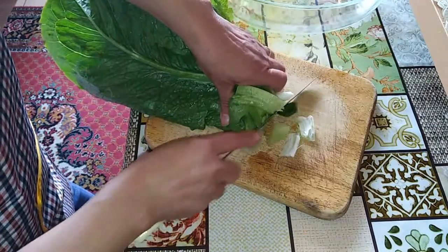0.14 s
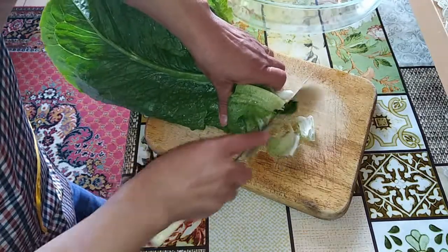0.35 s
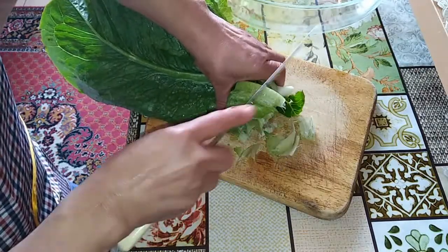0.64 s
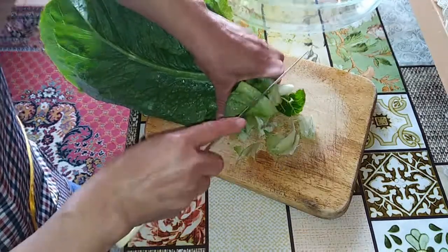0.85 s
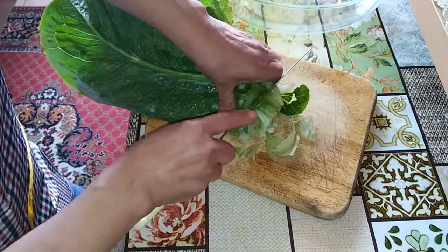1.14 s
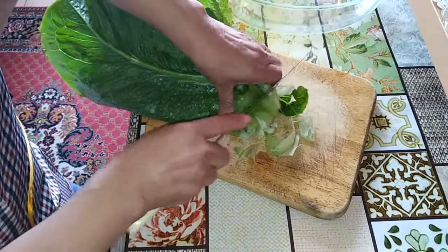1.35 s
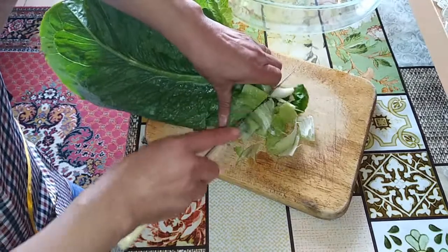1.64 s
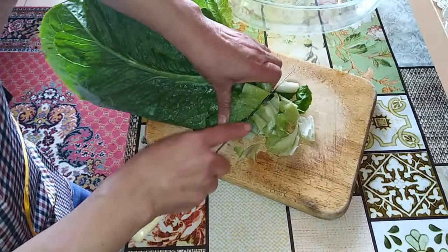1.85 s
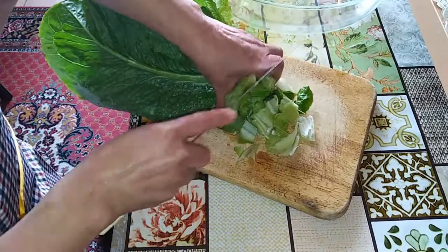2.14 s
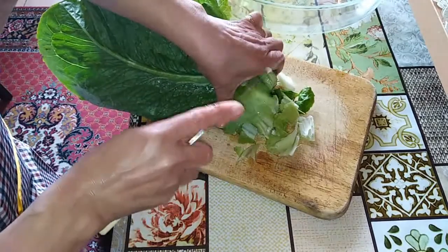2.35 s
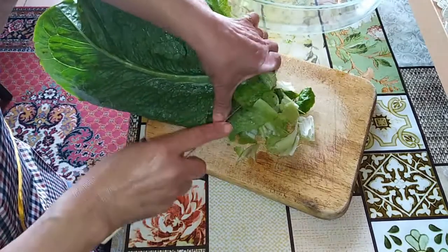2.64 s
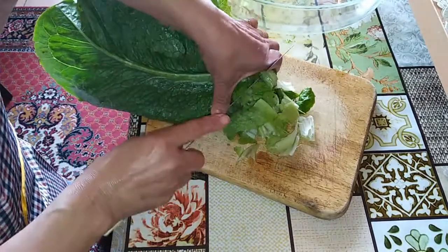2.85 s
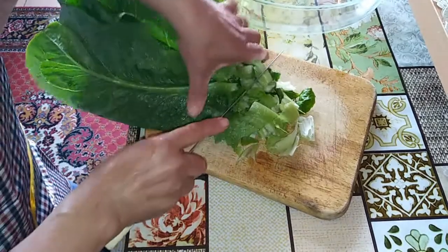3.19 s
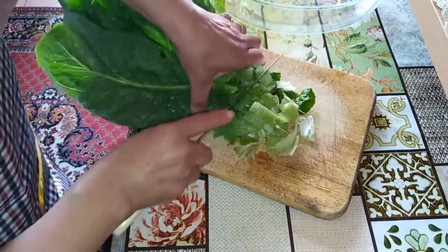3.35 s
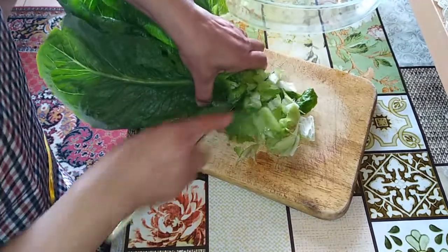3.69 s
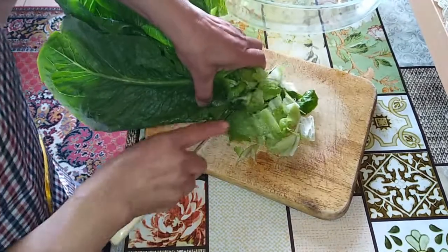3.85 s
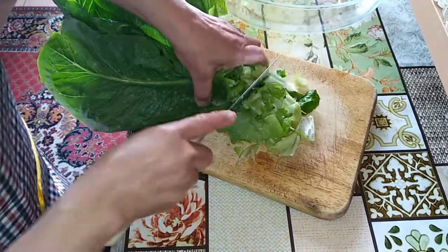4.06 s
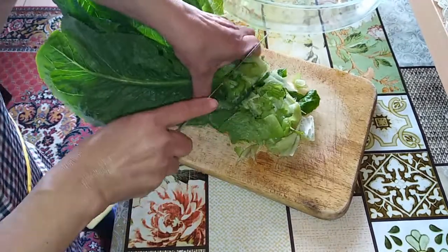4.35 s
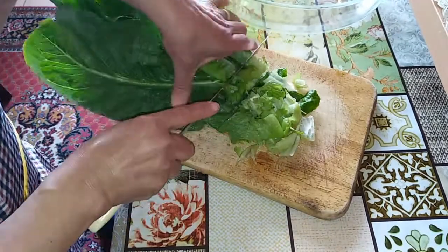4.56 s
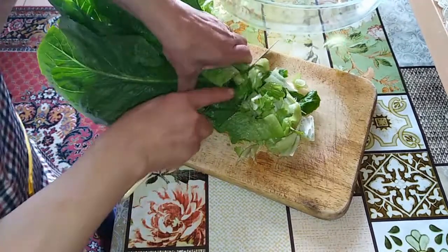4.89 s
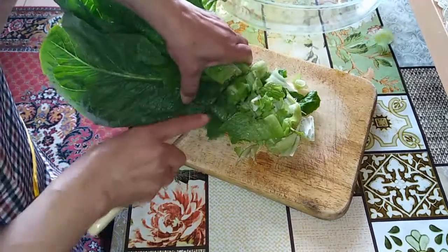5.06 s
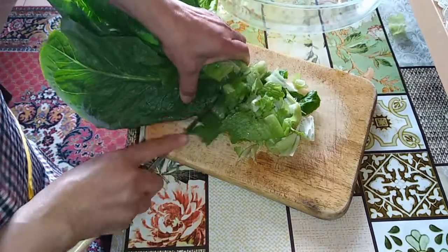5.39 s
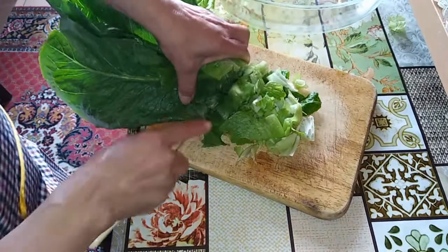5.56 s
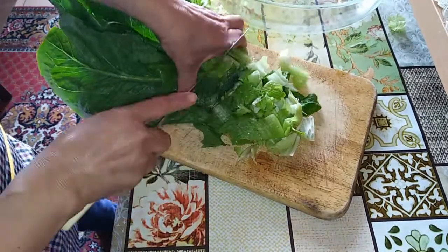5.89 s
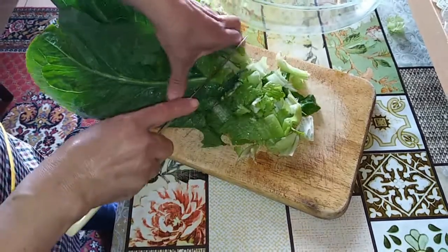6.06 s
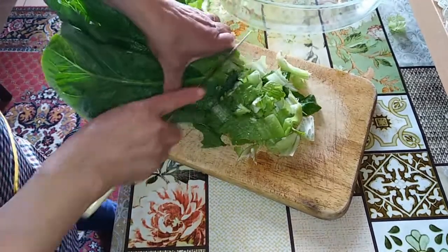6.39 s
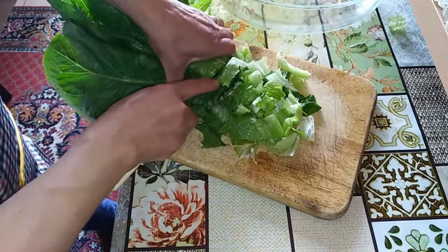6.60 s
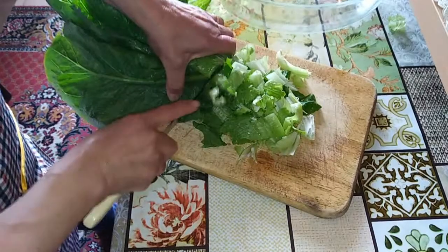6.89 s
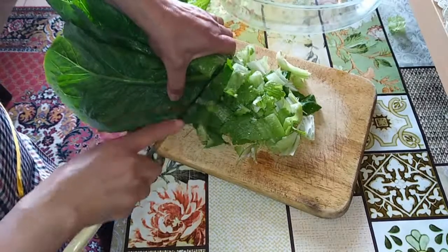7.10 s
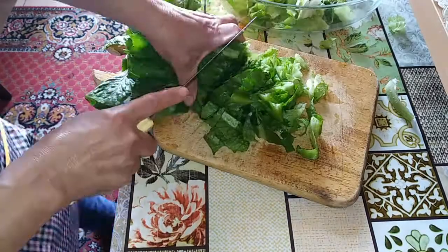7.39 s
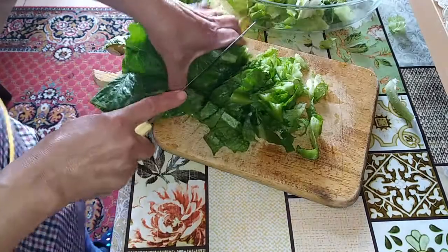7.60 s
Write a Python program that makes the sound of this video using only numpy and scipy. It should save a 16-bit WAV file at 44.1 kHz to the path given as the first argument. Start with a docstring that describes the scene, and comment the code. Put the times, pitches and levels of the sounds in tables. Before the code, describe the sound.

Crisp leaves and stiff ribs are cut in bursts: a quick crackle at once, a strong run of crunches, a long quiet gap with tiny rustles, then further groups of crunching strokes with bright cracks and hollow board knocks. The last cuts are smaller and fade into light leaf movement. Close phone pickup in a small, quiet, lightly reverberant kitchen, with faint hollow hum.

```python
"""In a quiet kitchen, a knife saws through a rolled bundle of crisp lettuce on a wooden board, near a phone.
Cells burst as thousands of tiny noise grains, ribs snap as ringing cracks, and the blade knocks the board,
which rings at its own pitches. Each push shakes the table as low noise; leaves rustle between strokes.
The blade hisses as it is drawn back, over a wavering hollow hum and faint air. A far tone starts near the end."""
import sys
import numpy as np
from scipy import signal
from scipy.io import wavfile
from scipy.ndimage import uniform_filter1d

SR = 44100
rng = np.random.default_rng(int(sys.argv[2]) if len(sys.argv) > 2 else 0)


def volts(x):
    """Linear amplitude factor 10**(x/20) for a level x in dB, scalar or array-like."""
    e = np.asarray(x, float) / 20
    return 10 ** e


def generate_wav(sig):
    """Save sig (samples, or channels by samples) to the path in sys.argv[1] as 16-bit PCM at SR."""
    pcm = np.round(np.clip(np.atleast_2d(sig).T, -1, 1) * 32767).astype(np.int16)
    wavfile.write(sys.argv[1], SR, pcm)


N = 341334  # length in samples
TIME = np.arange(N) / SR


def unit(x):
    """Scale to rms 1."""
    return x / np.sqrt(np.mean(x ** 2))


def at_hz(points, hz):
    """Read a (pitch, value) curve at any pitch, along a log pitch axis."""
    points = np.array(points)
    return np.interp(np.log(hz), np.log(points[:, 0]), points[:, 1])


def band(x, hz, width, order=2):
    """Keep only the pitches around hz, over a band width Hz wide."""
    edges = [hz - width / 2, hz + width / 2]
    return signal.sosfilt(signal.butter(order, edges, "band", fs=SR, output="sos"), x)


# How alike the left and right ports hear each pitch: pitch_hz, correlation (1 = the same)
EAR_LIKENESS = [(60, 1), (130, 0.87), (290, 0.82), (640, 0.37), (1400, 0.45), (3060, 0.67), (6730, 0.13),
                (14800, 0.12)]


def pair(hz, size):
    """Left and right noise, as alike as the two ports hear this pitch."""
    like = np.clip(at_hz(EAR_LIKENESS, hz), -.9, .99)
    mid, side = rng.standard_normal((2, size))
    opposite = side * np.array([[1], [-1]])
    return np.sqrt((1 + like) / 2) * mid + np.sqrt((1 - like) / 2) * opposite


def resonances(table, order=2):
    """Noise heard through resonances (pitch_hz, width_hz, level_db), scaled together to rms 1."""
    layers = [volts(db) * unit(band(pair(hz, N), hz, width, order)) for hz, width, db in table]
    return unit(sum(layers))


def flicker(hold):
    """Random levels held for `hold` samples and slewed, spread 1."""
    steps = np.repeat(rng.standard_normal(N // hold + 1), hold)
    return unit(uniform_filter1d(steps, size=hold))[:N]


def add(out, s, x):
    """Mix x into out at time s."""
    i = int(s * SR)
    out[:, i:i + x.shape[-1]] += x[..., :out.shape[1] - i]


def swells(start, rise, hold, db, fall_db_s, tail_db, tail_db_s):
    """Power of each event, one row each, every millisecond: climb, hold, quick fall, then a faint slow tail."""
    rise_db = 25  # climbed from start to the end of the rise
    t = np.arange(0, N / SR + .002, .001) - np.c_[start]
    rise, hold = np.maximum(np.c_[rise], .002), np.maximum(np.c_[hold], 0)
    after = np.maximum(t - rise - hold, 0)
    quick_fall = volts(-2 * fall_db_s * after)
    slow_tail = volts(2 * (tail_db - tail_db_s * after))
    climb_db = -rise_db * np.maximum(1 - t / rise, 0).clip(0, 8)
    return volts(2 * (np.c_[db] + climb_db)) * (quick_fall + slow_tail)


def to_samples(per_ms):
    """From one value a millisecond to one a sample."""
    return np.interp(TIME * 1000, np.arange(len(per_ms)), per_ms)


# Knife strokes through the bundle: start_s, rise_s, hold_s, level_db, thick_rib_db (above thin leaf)
KNIFE_STROKES = [(0, 0.0016, 0.0067, -33, 3.5), (0.034, 0.092, 0.074, -40.5, 1),
                 (.19, 0.035, 0.056, -46.5, 10), (0.822, 0.066, 0.023, -31, 2),
                 (0.885, .07, 0.085, -36, 0.5), (1.04, .04, 0.039, -46.5, 8),
                 (1.108, 0.061, 0.024, -39.5, 0.5), (1.25, .12, 0.045, -25.5, -1),
                 (1.442, 0.065, 0.073, -43, 4.5), (1.514, 0.066, 0.028, -38.5, 4.5),
                 (1.619, 0.058, 0.024, -28, 3.5), (3.137, 0.075, 0.023, -42, -4),
                 (3.186, .14, 0.19, -30.5, 3.5), (3.551, 0.038, 0.13, -34.5, 1),
                 (3.713, 0.065, 0.022, -31.5, 5.5), (4.549, .01, 0.27, -38, 4.5),
                 (4.641, 0.069, 0.073, -26, 2), (4.822, 0.03, 0.074, -38, 7.5),
                 (4.861, 0.05, 0.075, -30.5, 2.5), (4.992, 0.036, 0.025, -33, 4),
                 (5.173, 0.024, 0.057, -50.5, 6), (5.184, 0.097, 0.024, -34, 3),
                 (5.351, 0.062, 0.071, -43.5, 5), (6.158, 0.024, 0.17, -46.5, -1.5),
                 (6.233, 0.13, .16, -28.5, 2), (6.554, 0.032, 0.1, -40, 3), (6.586, 0.086, .14, -32.5, 5),
                 (6.952, 0.083, 0.017, -35.5, 1.5), (7.085, 0.041, 0.071, -46, 11),
                 (7.237, 0.032, .03, -52, 8), (7.287, .02, 0.03, -50.5, 2)]
# Loose leaves shift under the fingers: start_s, hold_s, level_db, thick_rib_db (above thin leaf)
LEAF_RUSTLES = [(0.327, 0.049, -65.5, 8), (0.405, 0.028, -61, 0), (0.648, 0.031, -46.5, -20),
                (0.73, 0.04, -54.5, -13), (0.792, 0.062, -48, -11), (1.85, 0.027, -61, 3),
                (2.061, 0.091, -58, -23.5), (2.186, 0.098, -61, -3.5), (2.329, 0.049, -71.5, -11),
                (2.494, 0.052, -64.5, -10), (2.674, 0.16, -73.5, -29.5), (2.851, 0.055, -67, -25),
                (2.917, .03, -56, -7), (2.957, 0.027, -47.5, -4), (3.022, 0.078, -56.5, -3.5),
                (3.946, 0.023, -48.5, 1), (4.048, 0.029, -50, -10), (4.122, .015, -64, -14),
                (4.166, 0.032, -59.5, -5), (4.23, 0.14, -52, -8), (4.346, 0.16, -50.5, -6),
                (5.54, 0.14, -63, -3.5), (5.814, 0.11, -54.5, -40), (5.915, 0.043, -47, -9),
                (5.981, 0.031, -49.5, -7), (6.048, 0.12, -59, -5), (7.34, .012, -60, -30),
                (7.38, 0.024, -60, -25), (7.424, .08, -51.5, -12), (7.504, 0.083, -50.5, -1.5),
                (7.63, 0.031, -58, -8), (7.707, .02, -60, -6)]


def blade():
    """Strokes and rustles together: crunch gain, and its thick-rib and sharp-edge colour in dB."""
    stroke_edge_db, rustle_edge_db = 5, 7  # boost of the top octave
    rustle_rise_s = 0.013
    rows = [(*row, stroke_edge_db) for row in KNIFE_STROKES]
    for s, hold_s, level_db, rib_db in LEAF_RUSTLES:
        rows.append((s, rustle_rise_s, hold_s, level_db, rib_db, rustle_edge_db))
    start, rise, hold, db, thick_db, edge_db = np.transpose(rows)
    power = swells(start, rise, hold, db, fall_db_s=303.5, tail_db=-19.5, tail_db_s=79.5)
    total = power.sum(axis=0)
    # the loudest event at each moment decides most of the colour
    thick_now, edge_now = thick_db @ power / total, edge_db @ power / total
    return to_samples(np.sqrt(total)), to_samples(thick_now), to_samples(edge_now)


# Basic colour of breaking leaf: pitch_hz, level_db (per Hz, before rib and edge colour)
LEAF_COLOUR = [(150, -34), (250, -1), (371, -8.5), (418, -12.5), (455, -1.5), (1190, -4.5), (2240, 3),
               (4000, 4), (7060, 6), (13500, -21), (14200, -17.5), (15000, -40.5)]


def crunch(count=7000, spread_db=3.4, reach_oct=.5, grain_s=.002, bed=.42, hold_s=.06):
    """Bursting cells: short grains of all sizes, each loudest around its own pitch."""
    when, size, pitch = rng.random((count, 3)).T
    at = (when * N).astype(int)
    power = volts(-2 * spread_db * np.log(1 - .994 * size))  # many small grains, few big ones
    grain_hz = 250 * 60 ** pitch
    gain, thick_db, edge_db = blade()
    out, whole = 0, 0
    for hz in 280 * 2 ** np.arange(0, 5.8, 1 / 3):
        near = np.exp(-(np.log2(hz / grain_hz) / reach_oct) ** 2)
        bursts = np.bincount(at, power * near, N)
        # lower grains come from bigger pieces and last longer
        keep = np.exp(-1 / (SR * grain_s * (4000 / hz) ** 0.044))
        bursts = signal.lfilter([1 - keep], [1, -keep], bursts)
        # even out the bursts over hold_s, so the strokes and rustles set the loudness
        local_mean = uniform_filter1d(bursts, int(hold_s * SR)) + 1e-12
        shape = np.sqrt(bed + bursts / local_mean)
        thick = np.clip(np.log2(2600 / hz) / 1.25, 0, 1.6)
        sharp = np.clip(np.log2(hz / 7000) / 0.75, 0, 1)
        db = at_hz(LEAF_COLOUR, hz) + 10 * np.log10(hz / 4000)  # higher bands are wider
        whole = whole + volts(2 * db)
        db = db + thick * thick_db + sharp * edge_db
        # each fold of leaf has its own colour, so the bands wander apart
        db = db + 2.5 * flicker(hold=2000)
        # the left port hears more treble, the right more of the low middle
        db = db + (.55 if hz > 900 else -.7) * np.array([[1], [-1]])
        out = out + volts(db) * unit(band(shape * pair(hz, N), hz, 0.25 * hz))
    return out * gain / np.sqrt(whole)


# Single rib snaps: start_s, peak_db (left-right average, before the room), pitch_hz of the ring
RIB_SNAPS = [(0.0973, -28.5, 6120), (0.155, -24, 4020), (0.1746, -24.5, 7360), (0.2588, -16, 7450),
             (0.4236, -41.5, 2470), (0.652, -31.5, 5300), (0.6713, -32, 5610), (0.7307, -19.5, 6700),
             (0.8281, -26, 3580), (0.8859, -7.5, 6550), (0.8992, -13.5, 6660), (0.9667, -20, 5800),
             (1.0369, -24, 5880), (1.0845, -21, 4060), (1.1764, -22.5, 7050), (1.1947, -20.5, 7090),
             (1.2075, -21, 6030), (1.296, -23, 8180), (1.3267, -19, 6360), (1.3494, -13.5, 5860),
             (1.3664, -18, 3520), (1.3892, -13.5, 7340), (1.5727, -23, 6500), (1.6481, -24.5, 7360),
             (1.6756, -16, 2980), (1.8791, -44, 3400), (2.0867, -44.5, 6560), (2.1161, -46, 6540),
             (2.2371, -44, 2160), (2.267, -44.5, 2150), (2.5226, -53.5, 3110), (2.9262, -44, 3970),
             (2.9691, -32.5, 6560), (3.2012, -33, 3520), (3.258, -24.5, 3770), (3.3181, -22, 6870),
             (3.3511, -12.5, 6700), (3.4312, -17.5, 5850), (3.5555, -23, 2350), (3.5912, -23, 3880),
             (3.6192, -35, 2900), (3.6526, -19.5, 1630), (3.7511, -26.5, 5750), (3.7971, -19, 4130),
             (3.9691, -34, 2600), (3.9962, -35.5, 4440), (4.0575, -38, 6340), (4.1762, -33.5, 2330),
             (4.4116, -32.5, 7650), (4.4394, -33, 6740), (4.5575, -27.5, 5600), (4.5832, -26, 6620),
             (4.6468, -16, 6030), (4.7126, -8, 5140), (4.8425, -22.5, 3350), (4.8505, -24.5, 3280),
             (4.8684, -23, 1980), (4.9227, -19, 3400), (5.026, -28.5, 3700), (5.1744, -27.5, 1650),
             (5.2235, -23, 2180), (5.2786, -22, 3360), (5.2957, -18.5, 3180), (5.4324, -28.5, 3740),
             (5.83, -31.5, 6860), (5.9404, -29, 6440), (6.1658, -29, 8440), (6.1942, -16.5, 5500),
             (6.2928, -24, 7220), (6.3167, -21, 7150), (6.3632, -21, 3740), (6.4076, -28, 7040),
             (6.5889, -47, 2470), (6.6692, -20, 1780), (6.774, -17.5, 3430), (6.9617, -37, 2560),
             (6.9827, -34, 1120), (7.0388, -20.5, 3650), (7.1288, -29.5, 2240), (7.278, -30.5, 2700),
             (7.3856, -36, 8200), (7.541, -29.5, 6860), (7.647, -32, 7150), (7.727, -32.5, 6800)]


def snaps(ring_share=.9, patter=.55, ring_width=.14):
    """Ribs break: a sudden bright crack with a short ring and a dying patter."""
    out, t = np.zeros((2, N)), TIME[:SR // 8]
    pans_db = 1 + 0.53 * rng.standard_normal(len(RIB_SNAPS))  # left above right
    for (s, db, hz), pan_db in zip(RIB_SNAPS, pans_db):
        crack_fade = volts(-60 * t / .008)
        patter_fade = volts(-60 * t / .05 * np.sqrt(5000 / hz))  # 60 dB down in .05 s at 5000 Hz
        burst = pair(hz, len(t)) * (crack_fade + patter * patter_fade)
        # the break itself is one hard step
        burst = burst + 4.5 * (np.arange(len(t)) == 0)
        ring = unit(band(burst, hz, ring_width * hz, order=1))
        crack = ring_share * ring + unit(band(burst, 5220, 6000))
        level = volts(db + np.array([[pan_db], [-pan_db]]) / 2)
        add(out, s, crack / np.abs(crack.mean(axis=0)).max() * level)
    return out


# Blade and ribs on the board: start_s, level_db (peak of the ring, before the room), hardness (0-1)
BOARD_KNOCKS = [(0.005, -27, 0.07), (0.257, -31.5, 0.87), (0.856, -40, 0.75), (1.086, -33.5, 0.45),
                (1.298, -40.5, 0.35), (1.434, -20.5, 0.93), (1.684, -25, 0.45), (3.253, -36.5, 0.55),
                (3.587, -34.5, 0.8), (3.654, -29.5, 0.95), (4.557, -28, 0.45), (4.711, -24.5, 0.6),
                (4.79, -15.5, 0.72), (4.888, -26, 1), (4.926, -22.5, 0.05), (5.174, -41.5, 1),
                (5.312, -27.5, 0.1), (6.295, -41, 0.9), (6.776, -32, 0.9), (7.034, -34, 0.7),
                (7.06, -41, 0.3), (7.211, -34.5, 0.15)]
# Ways the board rings: pitch_hz, level_db (before hardness and spot), fade_s (time to drop 60 dB)
BOARD_MODES = [(110, -6, 0.12), (144, -7, 0.15), (199, -2.5, 0.062), (412.6, -4, 0.13), (531.6, 1.5, 0.047),
               (604, -9, 0.082), (910, -8, 0.02), (954, -4.5, 0.045), (1160, -9, 0.056), (1500, -5, .018)]


def knocks(tick_db=-8):
    """The board rings at its modes, plus a short noise tick; a harder contact favours the higher modes."""
    out, t = np.zeros((2, N)), TIME[:SR // 6]
    hz, mode_db, fade_s = np.transpose(BOARD_MODES)[:, :, None]
    for s, db, hard in BOARD_KNOCKS:
        # every knock varies the level, pitch and left-right lean of each mode
        spot_db, detune, turn = rng.standard_normal((len(BOARD_MODES), 3)).T[:, :, None]
        tilt_db = (np.clip(hard, 0, 1) - .5) * 12 * np.log2(hz / 500)
        fade = volts(mode_db + tilt_db + 0.59 * spot_db - 60 * t / fade_s)
        rings = fade * (1 - np.exp(-t / 0.0012))
        phase = 2 * np.pi * hz * (1 + 0.016 * detune) * t
        # less alike at the two ports means further apart in phase
        lean = np.arccos(np.clip(at_hz(EAR_LIKENESS, hz), -1, 1)) * np.sign(turn) / 2
        ring = np.array([(rings * np.sin(phase + side * lean)).sum(axis=0) for side in (1, -1)])
        tick = band(pair(1100, len(t)), 1600, 1600, order=1) * volts(-60 * t / 0.012)
        knock = ring / np.abs(ring).max() + volts(tick_db) * tick / np.abs(tick).max()
        add(out, s, volts(db) * knock)
    return out


def room(x, t60_s=0.39, wet_db=-12):
    """Hard kitchen walls give a short diffuse tail, another to each port."""
    t = TIME[:SR // 3]
    tail = rng.standard_normal((2, len(t))) * volts(-60 * t / t60_s) * (t > .003)
    tail = band(tail, 3700, 7000, order=1)
    tail = tail / np.sqrt((tail ** 2).sum(axis=1, keepdims=True))
    return x + volts(wet_db) * signal.fftconvolve(x, tail, axes=1)[:, :N]


# The hand leans on the knife and the table shakes: start_s, hold_s, level_db (before the jolts)
HAND_PUSHES = [(0, 0.011, -33.5), (0.123, 0.047, -42.5), (0.243, 0.037, -40.5), (0.492, 0.23, -56),
               (0.644, .04, -51), (0.838, .05, -45), (.94, 0.27, -48.5), (1.191, 0.14, -41.5),
               (1.328, 0.076, -31), (1.554, 0.038, -46), (1.641, .08, -40), (2.092, 0.076, -61.5),
               (2.945, 0.065, -56.5), (3.287, 0.11, -39), (3.434, .07, -34.5), (3.647, 0.076, -47.5),
               (3.76, 0.029, -39), (3.949, .02, -51.5), (4.24, 0.23, -59), (4.556, 0.061, -37.5),
               (4.697, .1, -34.5), (4.878, 0.055, -36), (5.003, 0.097, -46.5), (5.186, 0.055, -49),
               (5.293, 0.011, -30), (5.422, 0.13, -57), (5.645, 0.013, -50.5), (6.165, 0.055, -46),
               (6.29, 0.15, -43.5), (6.435, 0.05, -32.5), (6.621, 0.26, -43), (7.04, 0.054, -42),
               (7.19, 0.039, -40.5), (7.256, 0.034, -49), (7.43, 0.18, -60.5)]
# Low resonances of the table: pitch_hz, width_hz, level_db (relative to each other)
TABLE_RESONANCES = [(35, 41, -19), (69, 23, -4.5), (84, 47, -15.5), (112.6, 40.8, 3), (151.5, 32, -10),
                    (185.6, 62, -6)]


def shake():
    """The table's low resonances, jolted by each push."""
    rumble_db = -66  # the table never rests quite still
    start, hold, db = np.transpose(HAND_PUSHES)
    rise = 0.022 + 0 * start  # seconds, the same for every push
    power = swells(start, rise, hold, db, fall_db_s=204, tail_db=-19, tail_db_s=67)
    jolts_db = 2.5 * flicker(hold=1500)
    gain = to_samples(np.sqrt(power.sum(axis=0) + volts(2 * rumble_db)))
    lean_db = np.array([[1.4], [-1.4]])  # stronger on the left
    return resonances(TABLE_RESONANCES) * gain * volts(jolts_db + lean_db)


# The blade is drawn back: start_s, end_s, pitch_hz, width_hz, level_db (of the hiss before its swell)
BLADE_SLIDES = [(0.36, 0.666, 6000, 2000, -64), (5.52, 5.82, 6100, 2500, -64.5)]


def slides():
    """The flat of the blade wipes back along the wet leaves: a thin smooth hiss."""
    out = 0
    for start, end, hz, width, db in BLADE_SLIDES:
        swell = np.sin(np.pi * np.clip((TIME - start) / (end - start), 0, 1)) ** .5
        out = out + volts(db) * swell * unit(band(pair(hz, N), hz, width))
    return out


# Hollow hum: pitch_hz, width_hz, level_db (relative to each other)
HUM_RESONANCES = [(549.6, 84, -7.5), (615.5, 49, -9.5), (1105, 60, -16.5)]


def hum():
    """A hollow hum of narrow noise bands that wavers, and is heard more while the leaves move."""
    hum_db, follow, leaves_ref_db = -78.5, 0.32, -62.5  # follow: dB of hum per dB of leaves
    waver_db = 6.5 * flicker(hold=1700)
    leaves_db = 20 * np.log10(blade()[0])
    lift_db = follow * np.clip(leaves_db - leaves_ref_db, -20, 15)
    return resonances(HUM_RESONANCES) * volts(hum_db + waver_db + lift_db)


# Far tone: pitch_hz, width_hz, level_db (relative to each other)
FAR_TONE_RESONANCES = [(490, 30, 0), (970, 50, 0)]


def far_tone():
    """Narrow bands of noise make a faint tone that comes in near the end and stays."""
    start_s, rise_s, level_db = 7.645, .015, -63
    fade_in = np.clip((TIME - start_s) / rise_s, 0, 1)
    return resonances(FAR_TONE_RESONANCES) * volts(level_db) * fade_in


def air():
    """A faint steady hiss of air: one wide band of noise."""
    return volts(-82.5) * unit(band(pair(1300, N), 1200, 1600))


def scene():
    """Leaves, board and table, with snaps and knocks in the room, over the hum, far tone and air."""
    port_lag = 2  # samples by which the left port hears late
    knife_work = crunch() + room(snaps() + knocks()) + shake() + slides()
    left, right = knife_work + hum() + far_tone() + air()
    return np.array([np.roll(left, port_lag), right])


# Noise level the suppressor assumes: pitch_hz, level_db (per frequency bin)
NOISE_GUESS = [(100, -110), (300, -96), (1000, -92), (3000, -110.5), (8000, -100), (14000, -102)]


def suppress(x, deepest_db=-16):
    """Noise suppressor: whatever sinks towards the assumed noise level is turned down further."""
    hz, _, spectra = signal.stft(x, SR, nperseg=1024, noverlap=768)
    power = (np.abs(spectra) ** 2).mean(axis=0)
    # smooth over neighbouring pitches, then over time
    power = uniform_filter1d(uniform_filter1d(power, size=3, axis=0), size=3, axis=1)
    noise = volts(2 * at_hz(NOISE_GUESS, np.maximum(hz, 20)))[:, None]
    gain = np.maximum(power / (power + noise), volts(deepest_db))
    return signal.istft(spectra * gain, SR, nperseg=1024, noverlap=768)[1][:, :N]


def band_limit(x):
    """A steep low-pass at the top of the band."""
    return signal.sosfilt(signal.butter(12, 15380, fs=SR, output="sos"), x)


def record(dry):
    """The phone thins the deepest bass, cuts the top and suppresses noise."""
    cut = signal.sosfilt(signal.butter(1, 60, "high", fs=SR, output="sos"), dry)
    cut = signal.sosfilt(signal.butter(6, 14300, fs=SR, output="sos"), cut)
    mix = suppress(cut)
    return band_limit(mix)


dry = scene()
out = record(dry)
generate_wav(out)
```